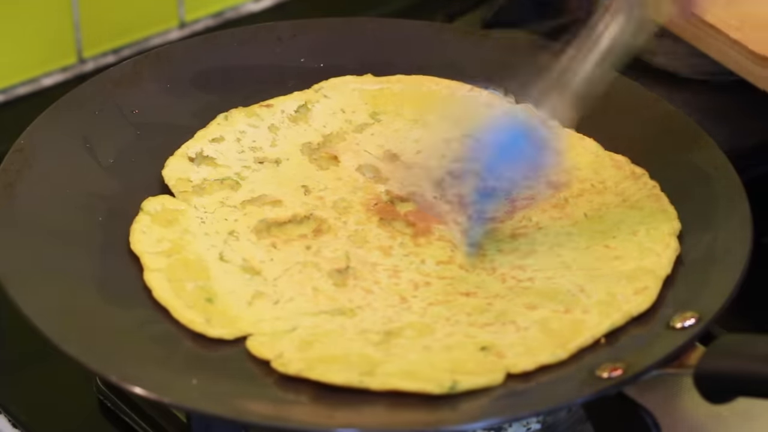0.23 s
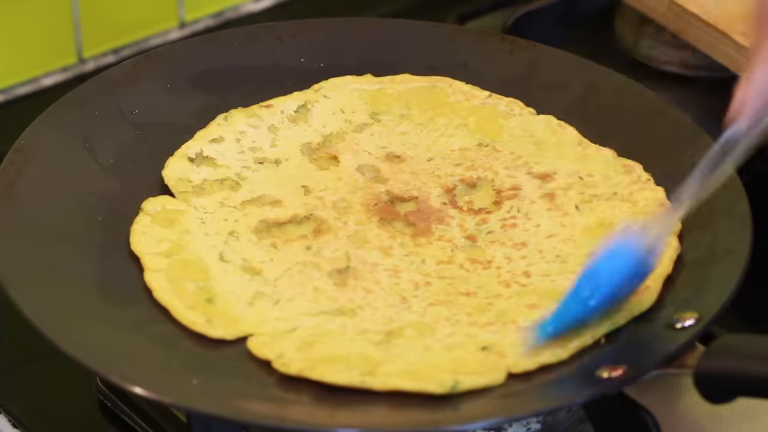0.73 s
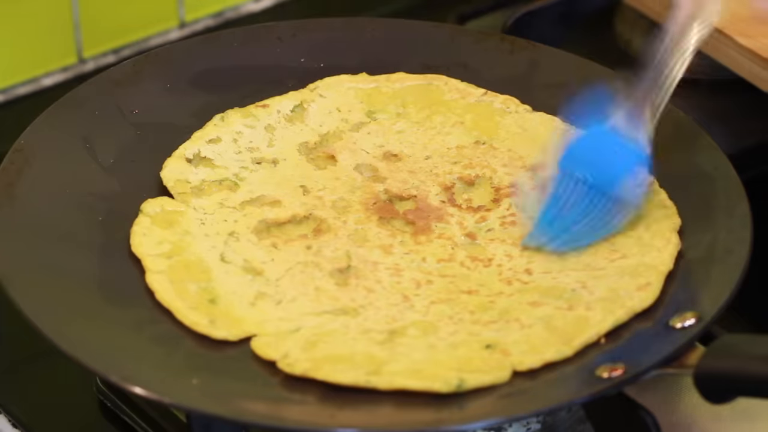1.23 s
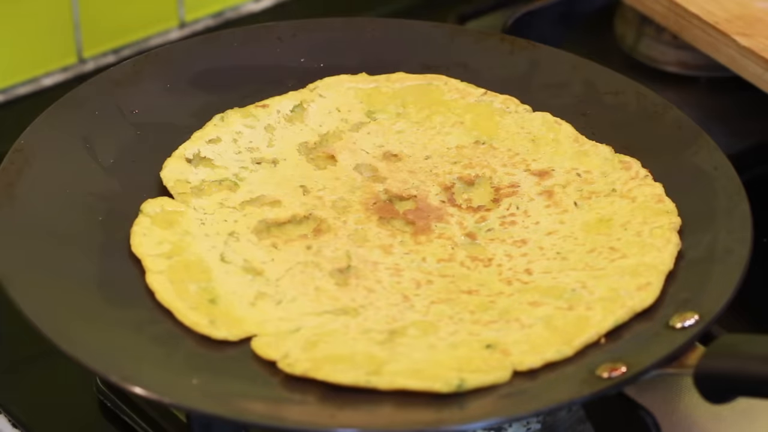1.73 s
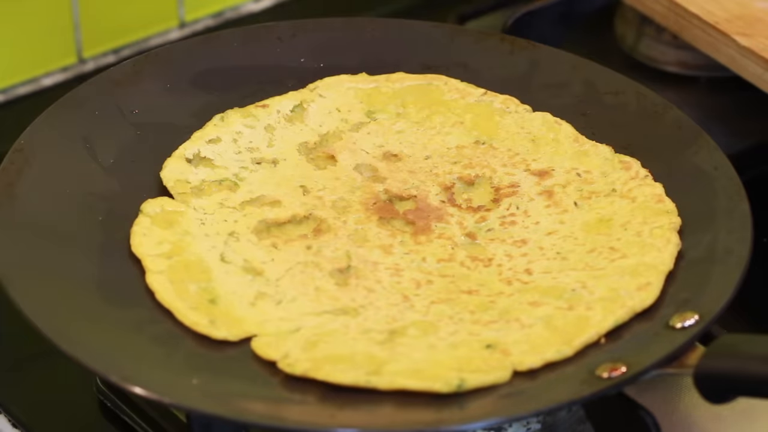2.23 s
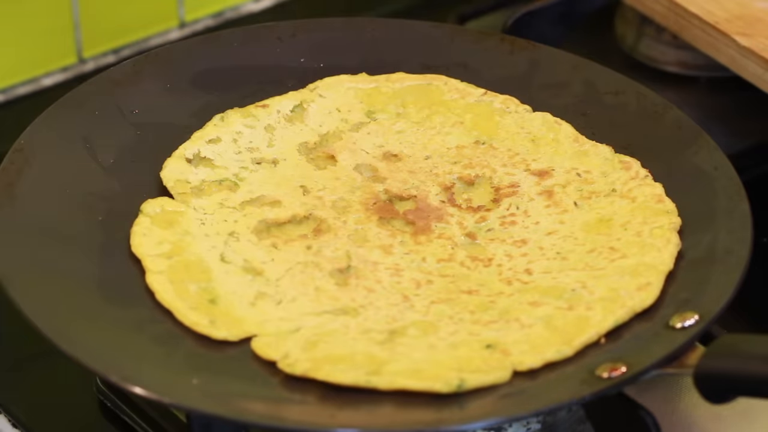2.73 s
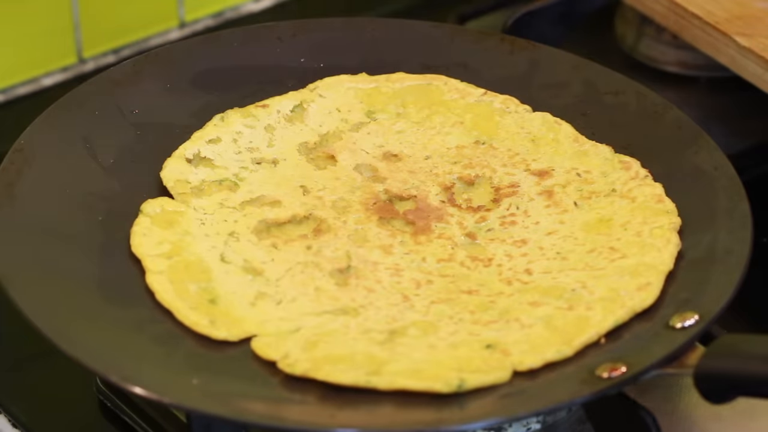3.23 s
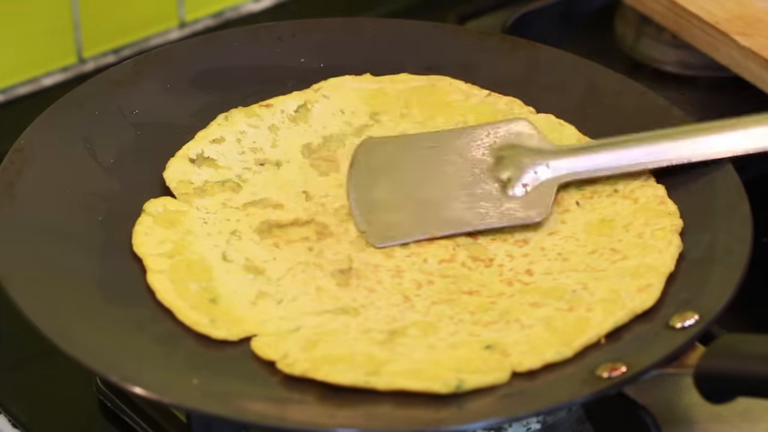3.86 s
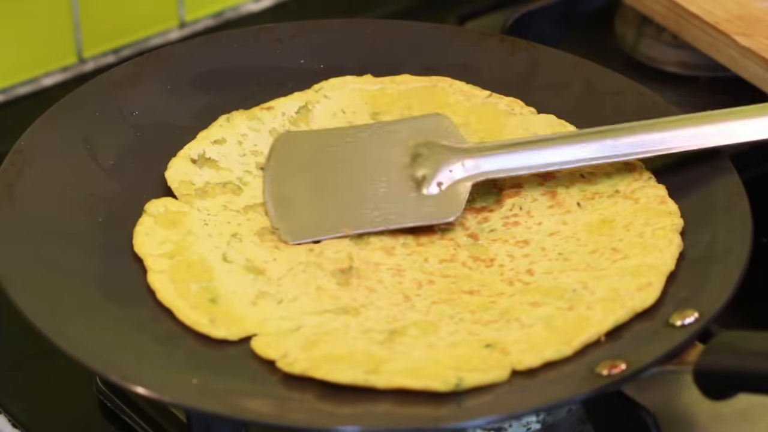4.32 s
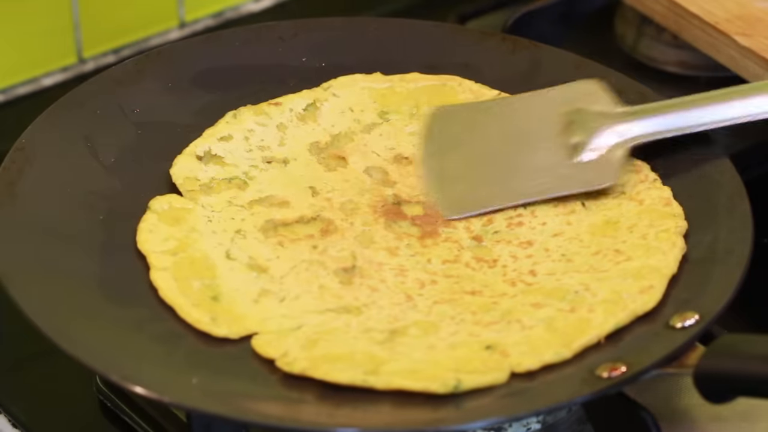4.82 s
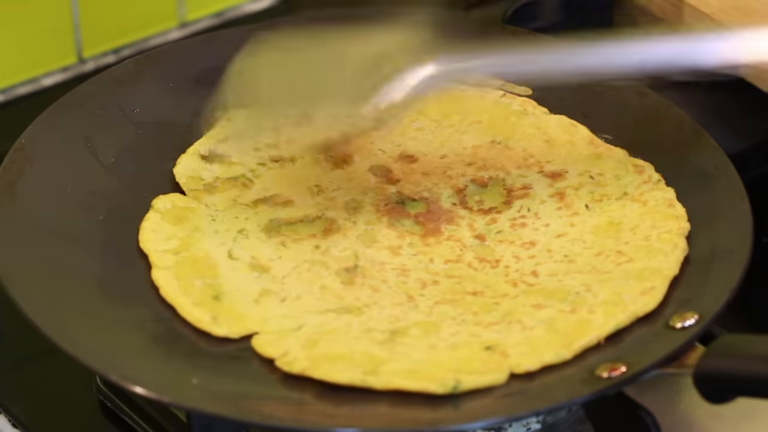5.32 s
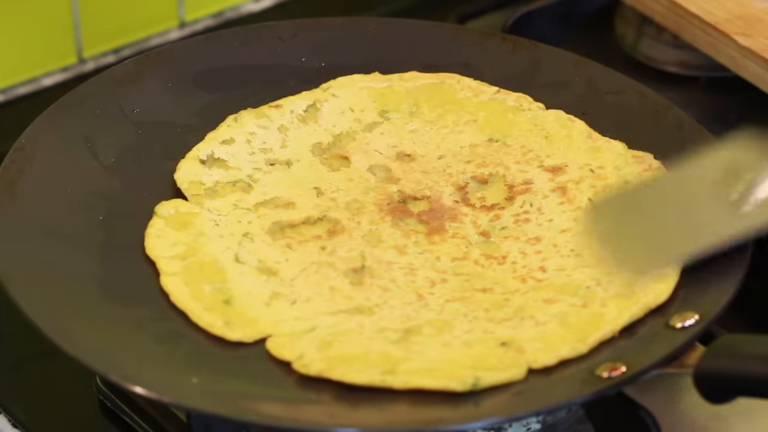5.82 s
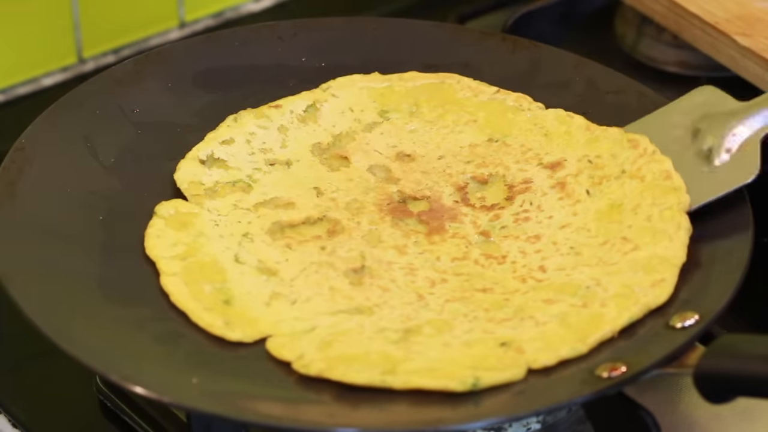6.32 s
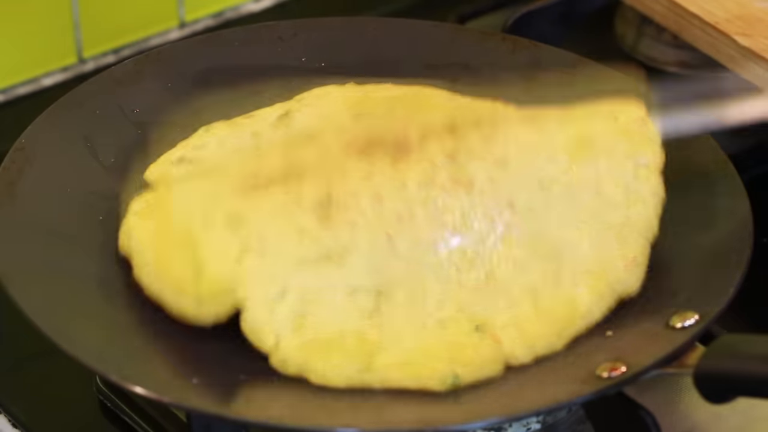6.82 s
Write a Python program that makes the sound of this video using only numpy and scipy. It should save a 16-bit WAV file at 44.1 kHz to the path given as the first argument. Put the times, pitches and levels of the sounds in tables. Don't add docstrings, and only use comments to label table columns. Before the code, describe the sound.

Close in a quiet, low-humming kitchen, a brush swishes dully over flatbread. A spoon clinks brightly in a dish. A steel turner lands flat, its handle ticks rapidly on iron amid a harsh burst of electrical crackle, then it slides faintly, knocks the griddle rim, and scrapes under the bread in short gritty strokes. A faulty microphone lead hisses as the cook moves.

```python
import sys
import numpy as np
from scipy import signal
from scipy.io import wavfile
from scipy.ndimage import uniform_filter1d

SR = 44100
rng = np.random.default_rng(int(sys.argv[2]) if len(sys.argv) > 2 else 0)


def undo_db(level):
    steps = np.asarray(level, float) / 20
    return 10 ** steps


def materialize(psi):
    bounded = np.clip(np.atleast_2d(psi).T, -1, 1)
    quanta = np.round(bounded * 32767).astype(np.int16)
    wavfile.write(sys.argv[1], SR, quanta)


N = 312228

# start_s, peak_db, brightness_db_per_octave, favoured_hz
HANDLE_TAPS = [(4.4593, -16.5, -0.5, 3040), (4.4635, -20, 1, 4000), (4.4793, -16, 0.5, 3060),
               (4.4815, -19.5, -2.5, 5070), (4.5395, -19.5, -4, 3900), (4.542, -22.5, 0, 950),
               (4.5543, -16, -1.5, 3060), (4.557, -21, 1, 5070), (4.6114, -20.5, -2.5, 3930),
               (4.6198, -21, -3, 3190), (4.679, -25.5, -7, 3870), (4.7437, -12, 14, 3600),
               (4.7457, -13, -12, 3100), (4.8392, -23.5, -5.5, 3850), (4.8973, -28.5, -5, 3220),
               (4.9312, -29.5, -2, 2900), (4.9632, -33, -9, 3940), (5.5463, -34, -3, 3040),
               (5.5747, -30, -7, 2900), (5.808, -45, -14, 1200)]
# start_s, peak_db, brightness_db_per_octave, favoured_hz
RIM_KNOCKS = [
    (6.043, -26.5, 2, 3050),
    (6.049, -20.5, -0.5, 550),
    (6.054, -23, -1, 3050),
    (6.062, -30, -2.5, 900),
    (6.07, -32, -3, 4650),
    (6.085, -41, 1, 900),
]
# start_s, peak_db, brightness_db_per_octave, favoured_hz
BOARD_NUDGES = [(3.058, -38, 4, 1210), (3.098, -42, -3, 290), (3.105, -39, 1, 590), (3.125, -51, -2, 290),
                (3.845, -37, -13, 590), (3.948, -30, -4.5, 180), (3.985, -37, 1, 180),
                (4.462, -30, -13, 583), (4.541, -44, 7, 900), (4.556, -47, -11, 580), (4.49, -30, -8, 180),
                (4.565, -31, 4, 180), (6.925, -47, -4, 846), (5.17, -35, -1.5, 176), (5.56, -43, 2, 590),
                (5.585, -41, 3, 800), (5.72, -46, 6, 1900), (5.806, -43, 5, 1210), (6.622, -34.5, -1, 800)]
# start_s, peak_db, brightness_db_per_octave, favoured_hz
BLADE_LANDINGS = [
    (3.8317, -22, 0, 3190),
    (3.958, -41, 0, 3870),
]
# start_s, peak_db, brightness_db_per_octave, favoured_hz
EDGE_SNAGS = [(5.524, -44, 3, 6780), (5.598, -44, 4, 8350), (6.278, -45, 2, 2600), (6.2795, -44, 0, 5600),
              (6.5012, -37.5, 7, 3300), (6.5304, -36, 3, 3550), (6.5581, -37, 4, 4700),
              (6.577, -29, -6, 1900), (6.625, -31, -8, 1850), (6.655, -27, -5, 4700),
              (6.7715, -39, 5, 6780), (6.803, -41, 6, 4700), (6.8355, -39.5, 8, 6780),
              (6.8633, -40, 0, 3300)]
# start_s, peak_db, brightness_db_per_octave, favoured_hz
GRIDDLE_HUMS = [
    (4.462, -46.5, 0, 560),
    (4.556, -52, 0, 560),
    (4.68, -41.5, 0, 560),
    (4.84, -42, 0, 560),
    (4.93, -46, 0, 560),
    (6.71, -46, 0, 870),
    (6.8, -47.5, 0, 870),
]
# start_s, peak_db, brightness_db_per_octave, favoured_hz
SPOON_CLINKS = [(2.2657, -30.5, -6, 1940), (2.2768, -34, -14, 2230), (2.2987, -35.5, -12, 1820),
                (2.362, -19.5, -3, 2270), (2.3665, -25, -8, 2300), (2.3744, -25, -12, 2260),
                (2.379, -27, -14, 2230), (2.384, -35, -20, 1420), (2.411, -33, -9, 2250),
                (2.4409, -12.5, 9, 1950), (2.4415, -19, -2, 2200), (2.448, -20.5, -11, 1900),
                (2.4555, -34, -6, 1820), (2.4624, -36, 11, 2200), (2.4823, -27, -12, 2320),
                (2.488, -28, -10, 2200), (2.4944, -21, 5, 1900), (2.499, -21, -8, 1460),
                (2.5064, -28, -10, 2010), (2.517, -29, -10, 1820), (2.5254, -31, 5, 2180),
                (2.533, -36, -12, 2070), (2.5397, -30, 3, 2400), (2.56, -36, -3, 2050),
                (2.586, -35.5, -14, 1840)]
# start_s, peak_db, brightness_db_per_octave, favoured_hz
SPOON_PINGS = [
    (2.364, -56, 0, 4760),
    (2.371, -44, 0, 6240),
    (2.442, -37, 0, 4760),
    (2.443, -43, 0, 6240),
    (2.459, -34, 0, 4760),
    (2.5254, -36, 0, 5500),
    (2.535, -45, 0, 4760),
]

# mode_hz, width_hz, level_db
HANDLE_MODES = [(950, 170, -0.5), (1490, 62, -9), (2250, 80, 1), (2630, 210, -5), (3060, 190, 5),
                (3740, 85, 1), (4000, 110, 2), (4320, 110, -1), (5070, 140, 5), (5970, 130, -1),
                (6700, 220, -1), (7840, 190, 0.5), (9400, 200, -3), (11300, 350, -9)]
# mode_hz, width_hz, level_db
RIM_MODES = [(554, 17, 1), (893, 20, 3.5), (1480, 40, -5), (2215, 20, -3), (2570, 45, -8), (3050, 77, -4.5),
             (3660, 80, -4), (4250, 41, -10), (4650, 40, 1), (5330, 110, 0.5), (6100, 90, -2),
             (7340, 210, 3.5), (8470, 88, 4), (9740, 250, 3.5)]
# mode_hz, width_hz, level_db
BOARD_MODES = [(180, 38, -2.5), (290, 9.4, 0), (590, 13, 1), (800, 46, -2), (1210, 44, -1), (1930, 27, -8)]
# mode_hz, width_hz, level_db
GRIDDLE_MODES = [(560, 9, -2), (870, 31, -4)]
# mode_hz, width_hz, level_db
DISH_MODES = [(1390, 30, -16), (1500, 30, -17), (1836, 25, -7), (1940, 34, 6.5), (2010, 50, -2),
              (2200, 36, 2.5), (2286, 65, 7.5), (2440, 60, -10), (2820, 82, -9), (3120, 77, -2),
              (3360, 170, 3.5), (3900, 140, -4), (5100, 1500, -4), (7740, 920, -7)]
# mode_hz, width_hz, level_db
SPOON_MODES = [(4760, 13, -4), (5450, 150, -12), (6240, 13, -5)]
# mode_hz, width_hz, level_db
FLAT_BLADE_MODES = [(2080, 9.8, -5), (3190, 71, 3), (3395, 55, -15), (3870, 160, 0), (4870, 60, -3),
                    (5240, 240, -7), (6460, 110, -1.5), (7900, 150, -7)]
# mode_hz, width_hz, level_db
FREE_BLADE_MODES = [(1950, 20, -8), (4400, 40, 1), (7100, 44, -11), (7300, 35, -2), (8000, 50, -8),
                    (8300, 45, -6), (9000, 37, 0), (11000, 90, -8), (12400, 70, -4), (13500, 120, -18)]
# mode_hz, width_hz, level_db
TIP_BLADE_MODES = [(1540, 41, -5), (2070, 64, -5), (2710, 52, 1.5), (2980, 120, -11), (3230, 110, 2.5),
                   (3540, 90, -13), (4530, 150, -10), (5100, 97, -3), (5760, 290, -5), (6360, 80, -7),
                   (6840, 80, -5), (8700, 200, -11), (9700, 200, -16), (11000, 250, -19)]
# mode_hz, width_hz, level_db
HALF_BLADE_MODES = [(1310, 55, -14), (1950, 32, -1), (2600, 120, -5), (2940, 70, -2), (3250, 120, -5),
                    (3530, 54, 0), (3760, 90, -4), (4650, 130, -4), (5750, 200, -10), (6420, 160, -9),
                    (7360, 150, -10), (8880, 200, -13), (11100, 270, -22)]
# mode_hz, width_hz, level_db
UNDER_BLADE_MODES = [(800, 130, -20), (1280, 93, -11), (1900, 27, -10), (2130, 100, 6), (2600, 100, 1),
                     (2840, 42, -4), (3220, 190, -6), (3550, 61, -5), (3900, 69, -14), (4700, 140, -4),
                     (5610, 220, -5), (6900, 150, -8), (8400, 270, -13), (10500, 340, -20)]

# time_s, level_db, low_modes_db
FREE_SLIDE = [
    (5.58, -77, -5),
    (5.68, -61, -3),
    (5.818, -60, -2),
    (5.97, -62, -2),
    (6.03, -71, -8),
]
# time_s, level_db, low_modes_db
TIP_PUSH = [
    (6.18, -72, 10),
    (6.255, -54.5, 2.5),
    (6.28, -42, -6),
    (6.305, -46.5, -6),
    (6.33, -46.5, -11),
    (6.36, -50.5, -6.5),
    (6.382, -55, -14),
    (6.4, -63, -9),
    (6.44, -67, -14),
]
# time_s, level_db, low_modes_db
SLIP_STROKE = [
    (6.46, -69, -14),
    (6.5, -50, -14),
    (6.522, -49, -19),
    (6.532, -40.5, -17),
    (6.554, -46.5, -11),
    (6.572, -40.5, -6),
    (6.583, -40.5, 1.5),
    (6.6, -50, 2),
    (6.63, -65, 2),
]
# time_s, level_db, low_modes_db
LIFT_STROKE = [
    (6.59, -50, 4),
    (6.615, -44, 0),
    (6.627, -40.5, 5),
    (6.645, -40.5, -2),
    (6.66, -38.5, -2),
    (6.685, -41.5, 0),
    (6.726, -46.5, -1),
    (6.78, -55, -5),
    (6.9, -75, -12),
]
# peak_s, rise_s_per_10db, fall_s_per_10db, level_db, bread_hz, width_share
BRUSH_STROKES = [
    (0.165, 0.03, 0.04, -43, 1340, 0.93),
    (0.498, -0.04, 0.08, -46, 1230, .75),
    (0.535, -0.01, 0.07, -45, 1180, .25),
    (.59, -0.1, 0.2, -63, 1150, 0.26),
]
# start_s, peak_db, pitch_hz
COUNTER_BUMPS = [
    (0.773, -44.5, 45),
    (2.361, -45, 70),
    (3.83, -49, 50),
    (6.046, -38, 50),
    (6.53, -50, 45),
]

# start_s, length_ms, strength
LEAD_ARCS = [(4.74748, .1, .8), (4.74772, .33, 1.1), (4.74817, .08, 1.3), (4.7483, .23, -.6),
             (4.7487, .5, -.15), (4.76618, .06, .7), (4.76628, .22, 1.1), (4.76658, .24, 1.3),
             (4.76694, .54, 2.4), (4.7676, .09, 4.5), (4.76776, .21, 7), (4.76802, .04, 3.4),
             (4.7681, .04, 3.8), (4.77778, .22, 1.2), (4.78592, .04, .5), (4.78599, .5, 1.2),
             (4.78671, .2, 1.6), (4.78696, .16, 1.9), (4.78718, .12, 2.5), (4.78736, .04, 2),
             (4.7875, .04, 2), (4.78762, .36, 5), (4.78829, .1, 4.9), (4.7885, .07, 2.5), (4.79712, .4, .5),
             (4.79764, .77, 2.7), (4.80054, .23, 1.4), (4.80156, .25, 1.6), (4.80194, .06, 3)]
# start_s, peak, decay_ms
LEAD_SPARKS = [
    (.7838, .08, .05),
    (.78395, -.1, .15),
    (1.06435, -.18, .17),
    (4.7286, .5, .12),
    (4.75862, 1.2, .14),
    (4.77712, 1.1, .08),
    (4.797, -2, .03),
]
# peak_s, rise_s_per_10db, fall_s_per_10db, level_db, hold_s
FRYING = [
    (.7845, .03, .001, -37, 0),
    (1.065, .045, .001, -46, 0),
    (4.7432, .054, .001, -33, 0),
    (4.7438, .0005, .025, -24, .005),
    (4.77, .01, .004, -23.5, .033),
    (4.807, .001, .016, -32, 0),
]
# peak_s, rise_s_per_10db, fall_s_per_10db, static_db, rustle_db
MOVES = [(0.18, -0.3, -0.4, -51, -29), (0.52, 0.8, 0.3, -52.5, -49.5), (0.78, 0, 0.06, -47.5, -47.5),
         (1.07, 0, 0.18, -56, -54), (2.48, 0.11, 0.09, -79, -44), (3.569, 0.11, 0.6, -45, -44.5),
         (3.85, 0.02, 0.02, -65, -37), (3.971, 0.1, 0.11, -44.5, -40.5), (4.22, 0.16, 0.31, -42, -44.5),
         (4.47, 0.08, 0.15, -44.5, -47), (4.69, 0.22, 0.07, -46, -41.5),
         (4.811, 0.0167, 0.0166, -84, -26.5), (4.85, -0.2, 0.4, -88, -49), (5.04, 0.44, 0.9, -53, -55.5),
         (5.188, -0.8, -0.18, -27.5, -39), (5.57, -0.9, 0.23, -52, -52.5), (5.82, 0.16, 0.32, -46.5, -60),
         (6.12, 0, 0.73, -52, -55), (6.3, 0.03, 0, -49, -59), (6.53, 0.1, -0.2, -52, -72),
         (6.65, .04, 0.2, -47, -70), (6.84, -1.9, -1.7, -49.5, -67)]
# frequency_hz, density_db_per_hz
FRYING_COLOUR = [(30, -7), (300, 3.5), (1000, -3), (3500, -4.5), (8000, -4), (16000, -6.5)]
# frequency_hz, density_db_per_hz
STATIC_COLOUR = [(30, -10), (150, -3), (600, 2.5), (2000, 4.5), (6000, 2), (12000, 0), (16000, -2)]
# frequency_hz, density_db_per_hz
RUSTLE_COLOUR = [(30, -13), (90, -5.5), (170, -3), (300, -6.5), (600, -7.5), (1200, -12), (3000, -24)]
# frequency_hz, density_db_per_hz
KITCHEN_COLOUR = [(15, -24), (91, -5), (183, -2.5), (400, -8), (520, -6), (1310, -13.5), (11600, -23),
                  (15600, -26.5)]


def turner_taps():
    out = blows(HANDLE_TAPS, HANDLE_MODES, ms=2.8, thud_db=-13.5, crack_db=-21, spread_db=0.7, thud_hz=149,
                shimmer_db=-17.5, shimmer_ms=14, fizz_db=-16, small_hz=480, favour=1.2, detune=0.003)
    out += blows(RIM_KNOCKS, RIM_MODES, ms=5.8, thud_db=-17.5, crack_db=-11.5, spread_db=2, thud_hz=34,
                 shimmer_db=-8.5, shimmer_ms=14.4, fizz_db=-17, small_hz=410, favour=0.86, detune=0.004)
    out += blows(BOARD_NUDGES, BOARD_MODES, ms=2.3, thud_db=-41, crack_db=-30, spread_db=-3.5, thud_hz=152,
                 shimmer_db=-27, shimmer_ms=14, fizz_db=-30, small_hz=86, favour=2.5)
    out += blows(BLADE_LANDINGS, FLAT_BLADE_MODES, ms=2.1, thud_db=-18, crack_db=-22, spread_db=1.5, thud_hz=150,
                 shimmer_db=-23, shimmer_ms=13, fizz_db=-6, small_hz=900, favour=0.48)
    out += blows(EDGE_SNAGS, UNDER_BLADE_MODES, ms=1.5, thud_db=-40, crack_db=-6, spread_db=2, thud_hz=150,
                 shimmer_db=-18, shimmer_ms=6, fizz_db=-8, small_hz=1500, favour=1.5)
    return out + blows(GRIDDLE_HUMS, GRIDDLE_MODES, ms=9, thud_db=-60, crack_db=-50, spread_db=0, thud_hz=38,
                       shimmer_db=-60, shimmer_ms=9, fizz_db=-30, small_hz=300, favour=6, detune=0)


def turner_strokes():
    out = np.zeros(N)
    add(out, *stroke(FREE_SLIDE, FREE_BLADE_MODES, (5000, 10000), high_db=-5, grit_db=4, rough_db=0,
                     drift_db=2.2, blur_db=-14, bend=0.002))
    add(out, *stroke(TIP_PUSH, TIP_BLADE_MODES, (2400, 4200), high_db=-0.2, grit_db=-14, rough_db=1.4,
                     drift_db=2, blur_db=-15, bend=0.005, glide=0.03))
    add(out, *stroke(SLIP_STROKE, HALF_BLADE_MODES, (2400, 4200), high_db=-3, grit_db=-15, rough_db=1.2,
                     drift_db=2.2, blur_db=-22, bend=0.0088, glide=0.06))
    add(out, *stroke(LIFT_STROKE, UNDER_BLADE_MODES, (2400, 4200), high_db=-5.5, grit_db=-16, rough_db=1,
                     drift_db=2.7, blur_db=-17, bend=0.013))
    return out


def spoon_in_dish():
    out = blows(SPOON_CLINKS, DISH_MODES, ms=2.5, thud_db=-23, crack_db=-23.5, spread_db=1.5, thud_hz=41.2,
                shimmer_db=-18, shimmer_ms=21, fizz_db=-40, small_hz=1380, favour=1.9, detune=0.01)
    return out + blows(SPOON_PINGS, SPOON_MODES, ms=4.3, thud_db=-60, crack_db=-50, spread_db=0, thud_hz=38,
                       shimmer_db=-60, shimmer_ms=9, fizz_db=-30, small_hz=3000, favour=20, detune=0)


def blows(table, body, ms, thud_db, crack_db, spread_db, thud_hz, shimmer_db, shimmer_ms, fizz_db,
          small_hz, favour, detune=0.0063):
    out = np.zeros(N)
    t = np.arange(SR // 6) / SR
    rest_hz, width, db = np.transpose(body)
    for s, peak_db, bright_db, favoured_hz in table:
        place = rng.standard_normal(len(body))
        rattle, crowd = rng.standard_normal((2, len(t)))
        hz = rest_hz * (1 + detune * rng.standard_normal(len(body)))
        rattle = rattle * np.exp(-t * 2000 / max(ms, 0.3))
        rattle = rattle * np.minimum(t / 0.00017 + 0.34, 1)

        mode_db = db + spread_db * place + bright_db * np.log2(hz / 3000)
        weight = undo_db(mode_db) * np.sqrt(width)
        octaves_away = np.log2(hz / favoured_hz)
        weight = weight * (1 + favour * np.exp(-(octaves_away / 0.11) ** 2))
        caught = abs(np.exp(2j * np.pi * np.outer(hz, t[:1500])) @ rattle[:1500]) / np.linalg.norm(rattle)
        shared_weight = weight / (caught + 0.25)
        metal = signal.fftconvolve(rattle, rings(t, hz, width, shared_weight))[:len(t)]

        shimmer = evened(signal.fftconvolve(crowd, rings(t[:400], hz, width + 600, weight))[:len(t)])
        shimmer = shimmer + undo_db(fizz_db + 0.61 * bright_db) * np.diff(crowd, prepend=0)
        shimmer = undo_db(shimmer_db) * shimmer * np.exp(-t * 1000 / shimmer_ms)
        crack = undo_db(crack_db + bright_db) * (rattle - 1.9 * np.roll(rattle, 1))
        thud = np.sin(2 * np.pi * thud_hz * t) * np.exp(-t * thud_hz / 0.31)
        ringing = low_cut(metal / abs(metal).max() + crack + shimmer, small_hz)
        add(out, s, undo_db(peak_db) * (ringing + undo_db(thud_db) * thud))
    return out


def stroke(rows, body, edges_hz, high_db, grit_db, rough_db, drift_db, blur_db, bend, glide=0):
    start, level, low_db = curve(rows)
    n = len(level)
    happens = rng.random(n) < 9000 / SR
    slips = happens * undo_db(rough_db * np.minimum(rng.exponential(1, n), 3))
    slips = evened(slips * rng.standard_normal(n)) * undo_db(1.4 * wander(n, 5))
    groups = np.zeros((3, n))
    for hz, width, db in body:
        glides = 1 < hz / edges_hz[0] < 1.4
        glide_path = glide * glides * np.linspace(-1, 1, n)
        bent = hz * (1 + bend * wander(n, 37) + glide_path)
        blur = resonate(resonate(slips, bent, width + 500), bent, width + 500)
        mode = resonate(slips, bent, width) + undo_db(blur_db) * blur
        groups[np.digitize(hz, edges_hz)] += undo_db(db + drift_db * wander(n, 28)) * mode
    low, middle, high = (evened(g) for g in groups)
    grit = undo_db(grit_db) * evened(np.diff(slips, prepend=0))
    return start, level * (undo_db(low_db) * low + middle + undo_db(high_db) * (high + grit))


def brush(s, rise, fall, db, hz, width):
    drag = rng.standard_normal(N)
    bread = resonate(resonate(drag, hz, width * hz), hz, 1.6 * width * hz)
    return swells(s, rise, fall, db) * evened(bread)


def bumps():
    out = np.zeros(N)
    for s, db, hz in COUNTER_BUMPS:
        turns = np.arange(0, 1.5, hz / SR)
        add(out, s, undo_db(db) * np.sin(2 * np.pi * turns) * np.hanning(len(turns)))
    return out


def arcs():
    charge = np.zeros(N)
    u = np.arange(0, 3, 1000 / SR)
    for s, peak, ms in LEAD_SPARKS:
        add(charge, s, peak * np.exp(-u / ms))
    for s, ms, strength in LEAD_ARCS:
        add(charge, s, np.full(round(ms * SR / 1000), strength))
    kept = 0.41
    charge = signal.lfilter([1 - kept], [1, -kept], charge)
    leak_hz, coupling_hz, damping = 45.3, 91, 0.58
    charge = signal.lfilter(*signal.bilinear([1, 0], [1, 2 * np.pi * leak_hz], SR), charge)
    w = 2 * np.pi * coupling_hz
    return signal.lfilter(*signal.bilinear([1, 0, 0], [1, 2 * damping * w, w ** 2], SR), charge)


def frying():
    return swells(*np.transpose(FRYING)) * noise(FRYING_COLOUR, patchy_db=1.5)


def static():
    s, rise, fall, static_db, _ = np.transpose(MOVES)
    level = np.hypot(swells(s, rise, fall, static_db), undo_db(-63.5))
    return level * noise(STATIC_COLOUR, patchy_db=2)


def rustle():
    s, rise, fall, _, rustle_db = np.transpose(MOVES)
    return swells(s, rise, fall, rustle_db) * noise(RUSTLE_COLOUR, patchy_db=2)


def kitchen_hum():
    return undo_db(-51.5) * noise(KITCHEN_COLOUR, patchy_db=1.4)


def room(x):
    t60_s, level_db = 0.51, -9
    at = np.arange(200, SR // 2 - 20, 20)
    taps = np.zeros(SR // 2)
    taps[at + rng.integers(0, 20, len(at))] = rng.choice([-1., 1.], len(at))
    hz, t, z = signal.stft(taps, SR, nperseg=256)
    t60 = t60_s / (1 + hz / 9000)
    tail = signal.istft(z * undo_db(-60 * t / t60[:, None]), SR, nperseg=256)[1]
    return undo_db(level_db) * signal.fftconvolve(x, tail / np.linalg.norm(tail))[:N]


def rings(t, hz, width, weight):
    decay = np.exp(-np.pi * np.outer(width, t))
    return weight @ (decay * np.sin(2 * np.pi * np.outer(hz, t)))


def resonate(x, hz, width):
    turn = np.exp(2j * np.pi * np.cumsum(hz * np.ones(len(x))) / SR)
    r = np.exp(-np.pi * max(width, 2) / SR)
    return 2 * (turn * signal.lfilter([1 - r], [1, -r], x / turn)).real


def low_cut(x, hz):
    return signal.sosfilt(signal.butter(3, hz, "high", fs=SR, output="sos"), x)


def noise(colour, patchy_db):
    hz = np.fft.rfftfreq(1024, 1 / SR)
    a, b, patches = rng.standard_normal((N // 256 + 5, 513, 3)).T
    patches = uniform_filter1d(patches, size=10, axis=0)
    patches = evened(uniform_filter1d(patches, size=8, axis=1))
    f, db = np.transpose(colour)
    colour_db = np.interp(np.log(hz + 1), np.log(f + 1), db)[:, None]
    spectra = (a + 1j * b) * undo_db(colour_db + patchy_db * patches)
    return evened(signal.istft(spectra, nperseg=1024, noverlap=768)[1][:N])


def swells(peaks_s, rises_s, falls_s, levels_db, holds_s=0):
    late = np.arange(N)[:, None] / SR - peaks_s
    before = -late / np.maximum(rises_s, 1e-4)
    after = (late - holds_s) / np.maximum(falls_s, 1e-4)
    below = np.maximum(np.maximum(before, after), 0)
    return np.sqrt((undo_db(levels_db - 10 * below) ** 2).sum(axis=1))


def curve(rows):
    s, db, *others = np.transpose(rows)
    t = np.arange(s[0], s[-1], 1 / SR)
    level = undo_db(np.interp(t, s, db)) * signal.windows.tukey(len(t), 0.003 / (s[-1] - s[0]))
    return s[0], level, *(np.interp(t, s, c) for c in others)


def wander(n, ms):
    size = int(ms * SR / 1000)
    return evened(uniform_filter1d(uniform_filter1d(rng.standard_normal(n), size), size))


def evened(x):
    return x / np.sqrt(np.mean(x ** 2) + 1e-20)


def add(mix, s, sound):
    part = mix[round(s * SR):][:len(sound)]
    part += sound[:len(part)]


def scene():
    near = turner_taps() + turner_strokes() + spoon_in_dish() + bumps()
    near += sum(brush(*row) for row in BRUSH_STROKES)
    return (near + room(near) + rustle() + kitchen_hum())[None]


def roll_off(x):
    return signal.sosfilt(signal.butter(12, 15700, fs=SR, output="sos"), x)


def record(dry):
    clipped = np.clip(dry + static() + frying() + arcs(), -0.99, 0.99)
    low_pass = signal.firwin(127, 16300, fs=SR)[None]
    mix = signal.oaconvolve(clipped, low_pass, "same")
    return roll_off(mix)


dry = scene()
out = record(dry)
materialize(out)
```